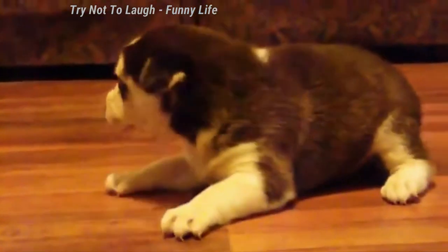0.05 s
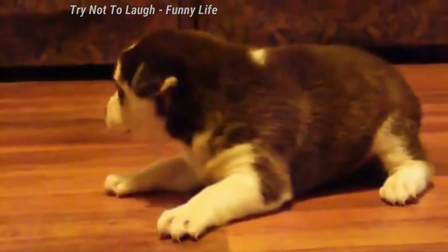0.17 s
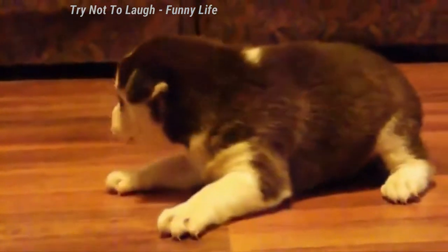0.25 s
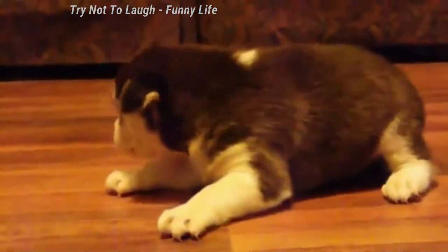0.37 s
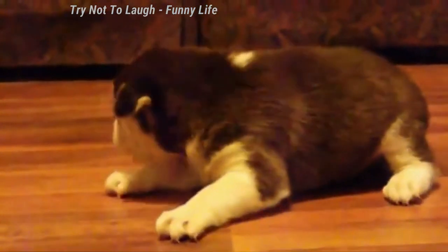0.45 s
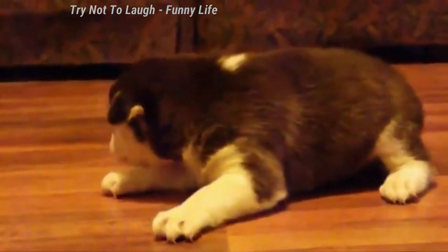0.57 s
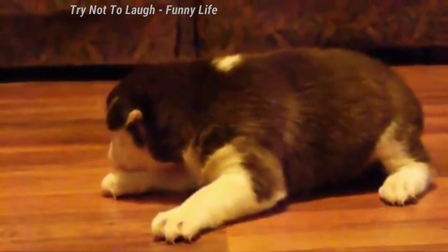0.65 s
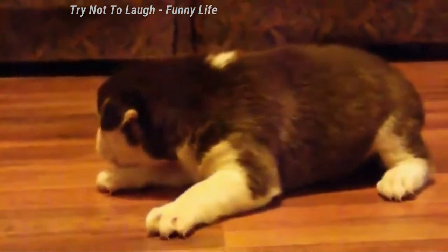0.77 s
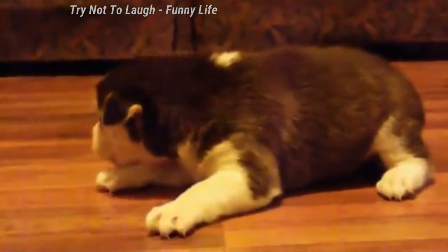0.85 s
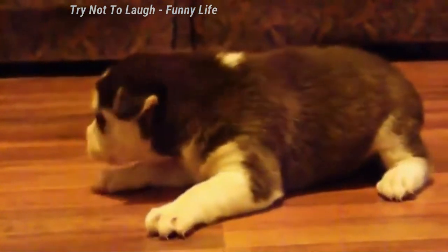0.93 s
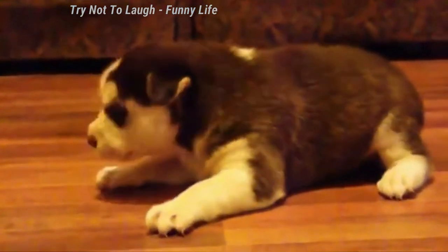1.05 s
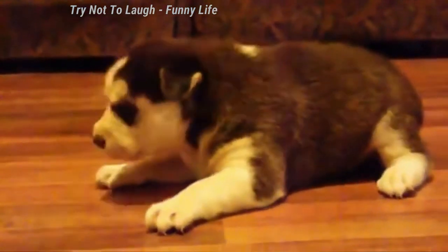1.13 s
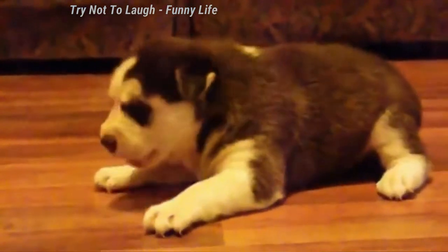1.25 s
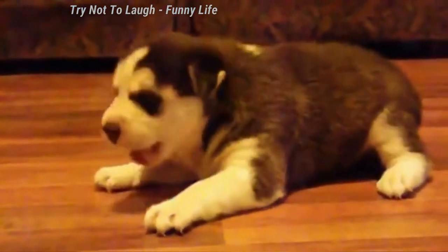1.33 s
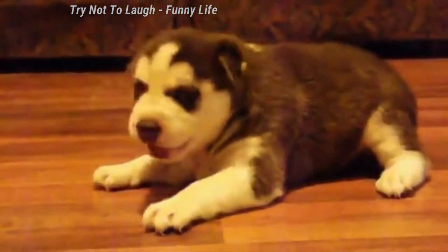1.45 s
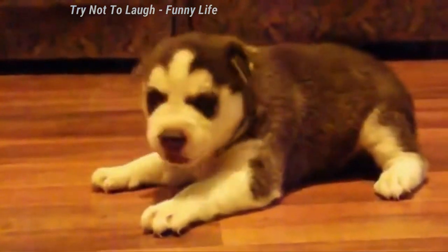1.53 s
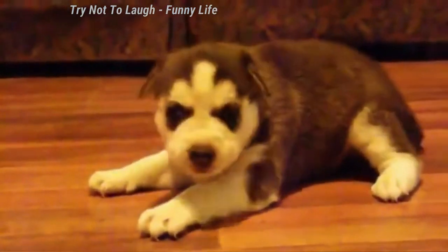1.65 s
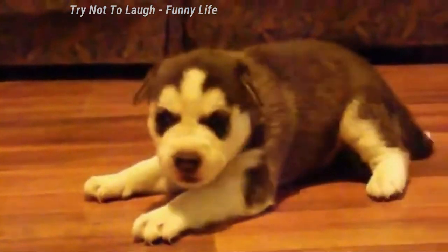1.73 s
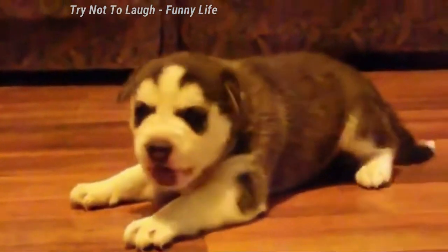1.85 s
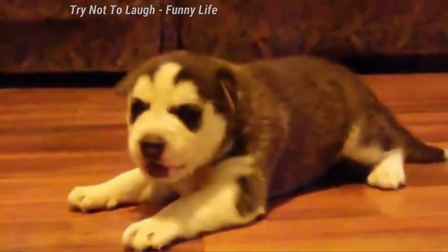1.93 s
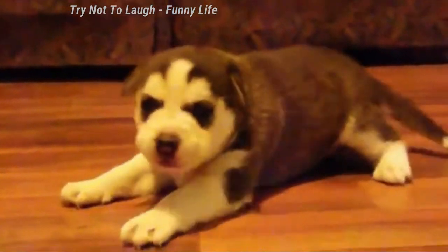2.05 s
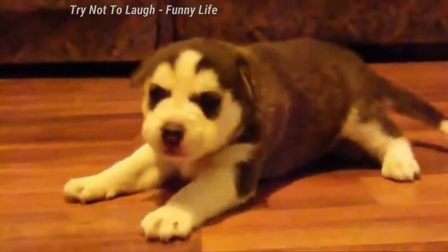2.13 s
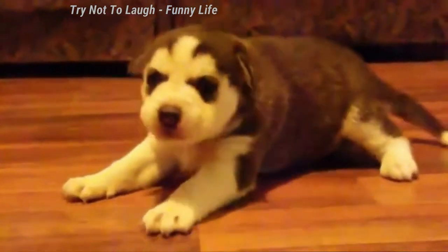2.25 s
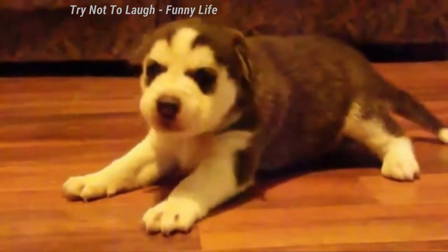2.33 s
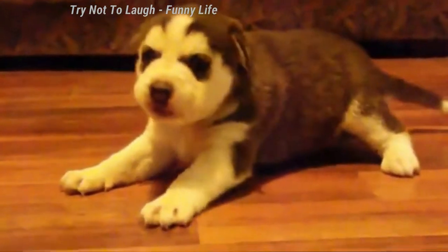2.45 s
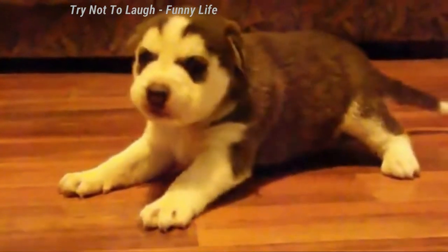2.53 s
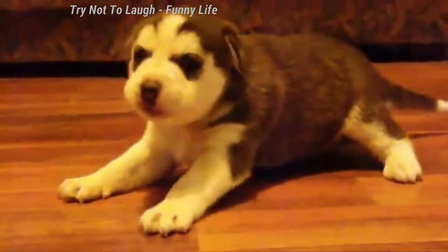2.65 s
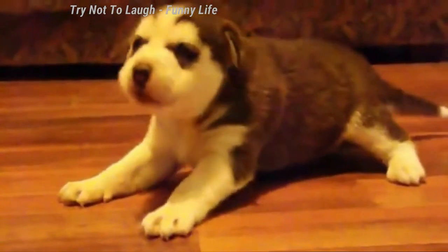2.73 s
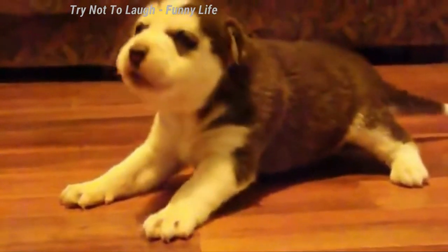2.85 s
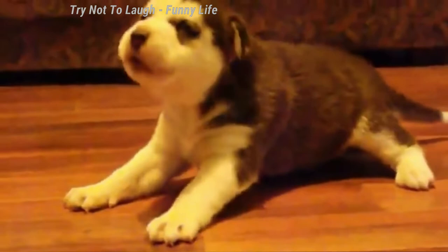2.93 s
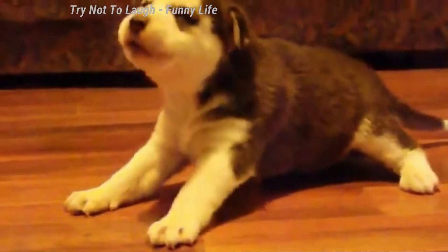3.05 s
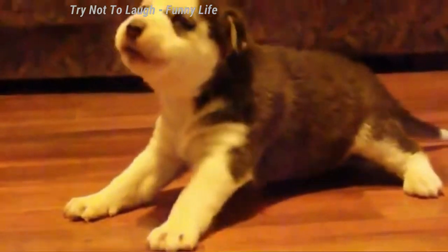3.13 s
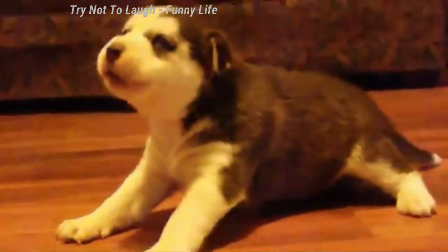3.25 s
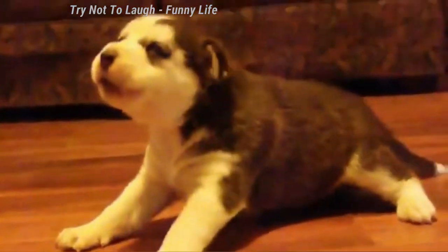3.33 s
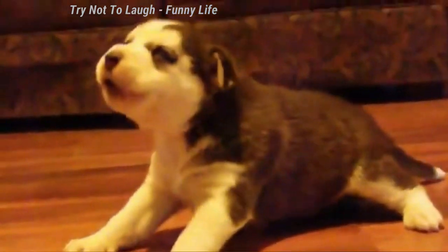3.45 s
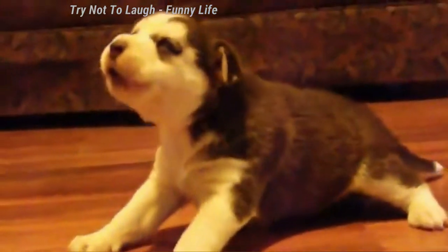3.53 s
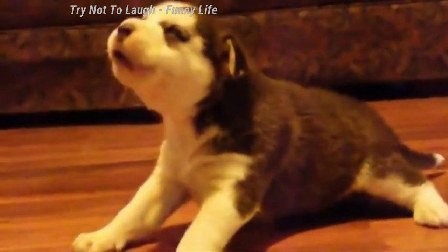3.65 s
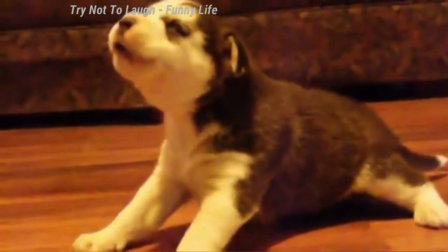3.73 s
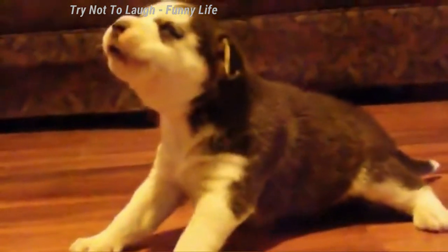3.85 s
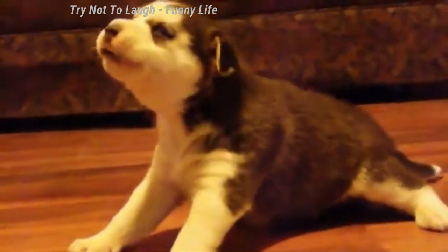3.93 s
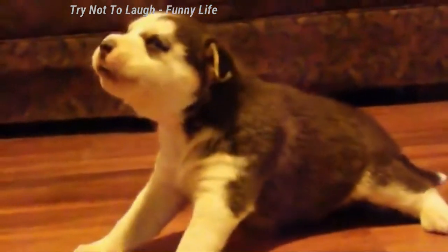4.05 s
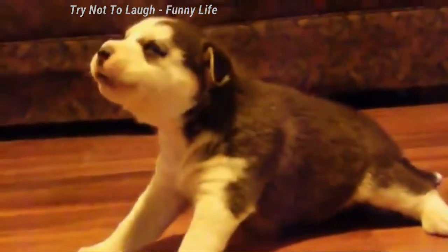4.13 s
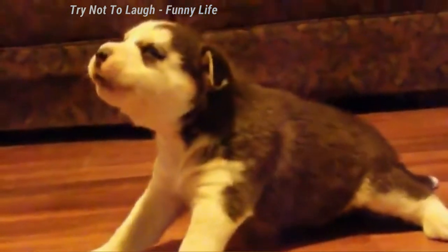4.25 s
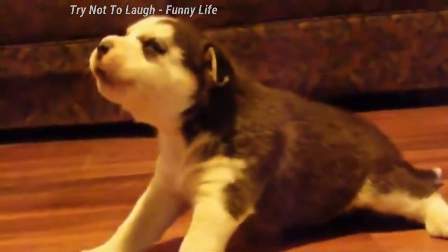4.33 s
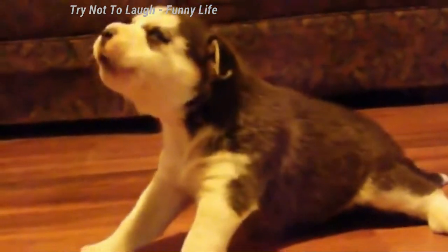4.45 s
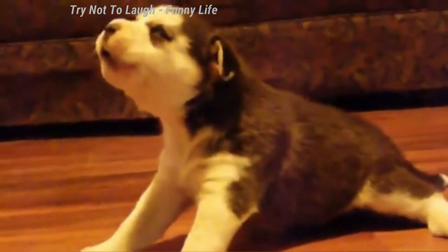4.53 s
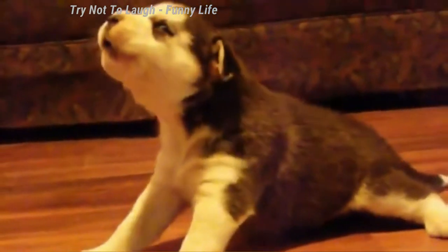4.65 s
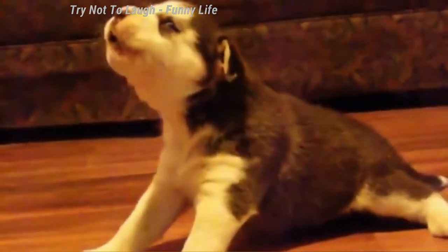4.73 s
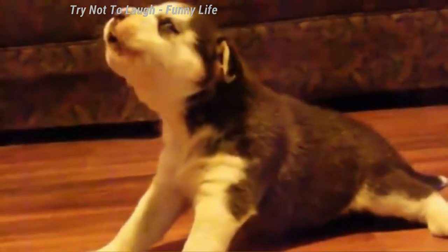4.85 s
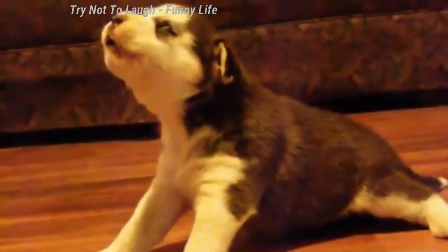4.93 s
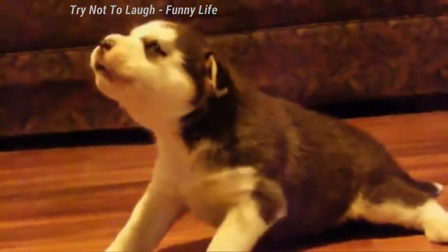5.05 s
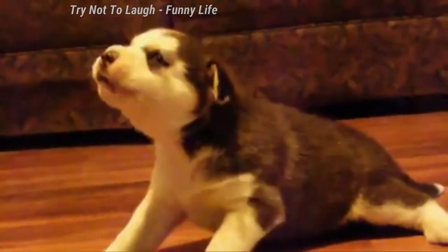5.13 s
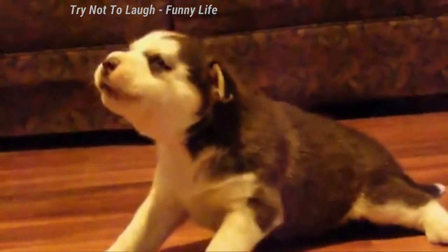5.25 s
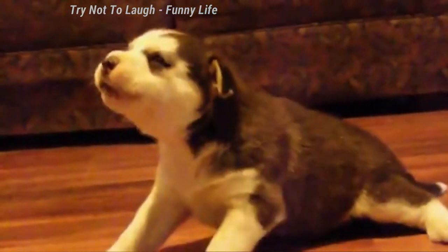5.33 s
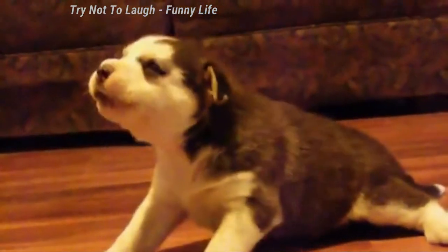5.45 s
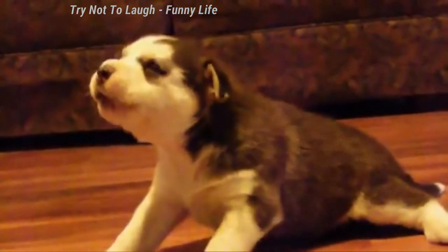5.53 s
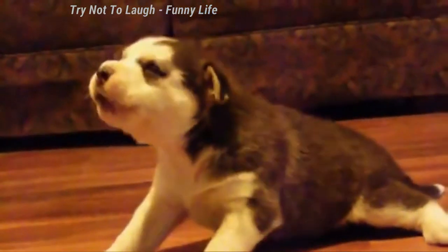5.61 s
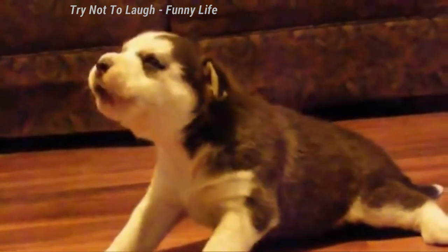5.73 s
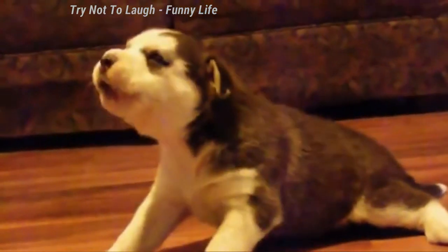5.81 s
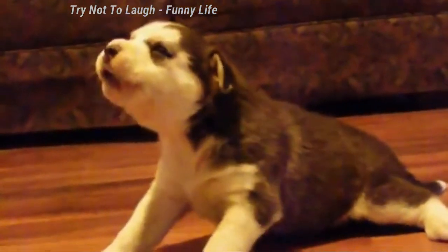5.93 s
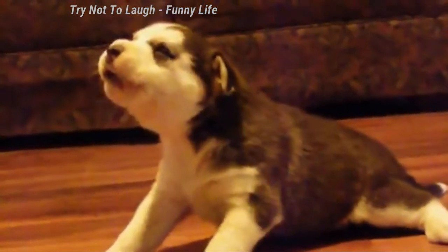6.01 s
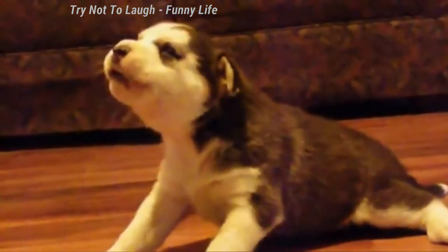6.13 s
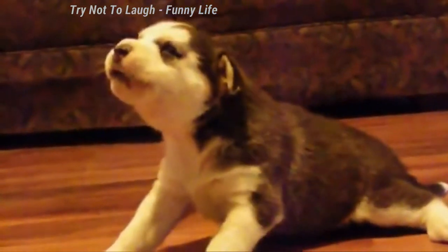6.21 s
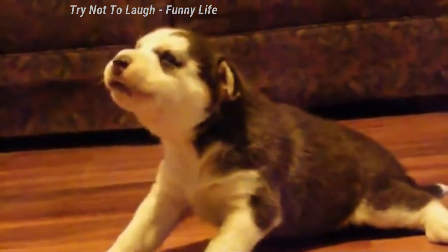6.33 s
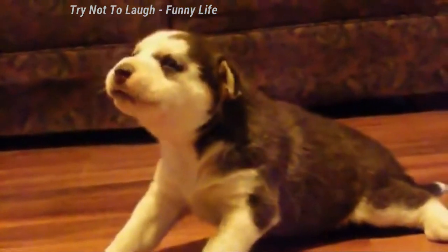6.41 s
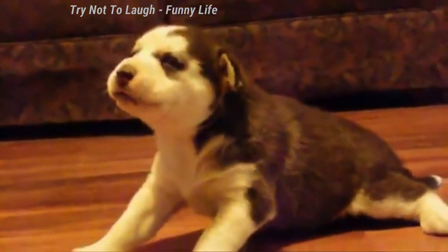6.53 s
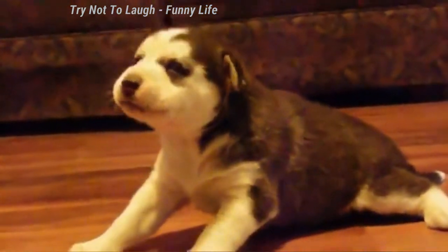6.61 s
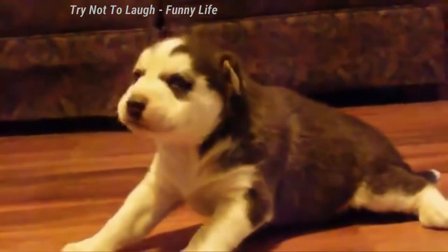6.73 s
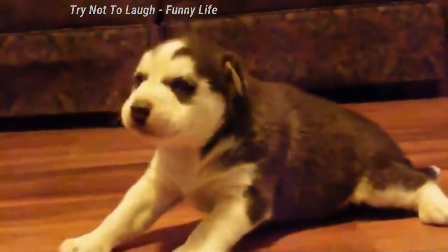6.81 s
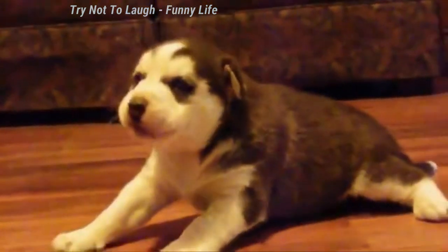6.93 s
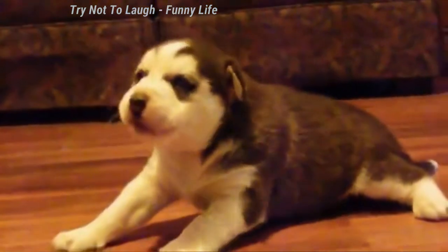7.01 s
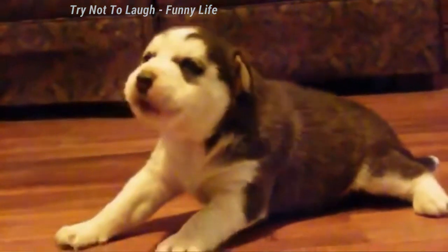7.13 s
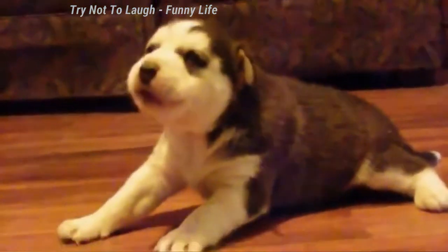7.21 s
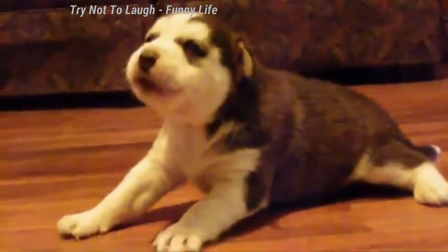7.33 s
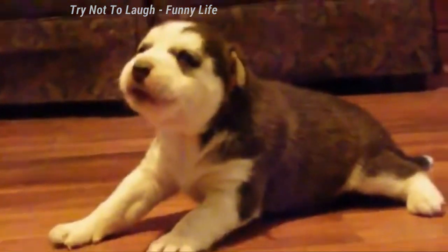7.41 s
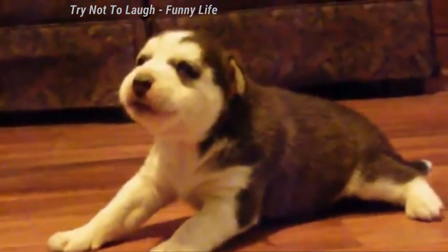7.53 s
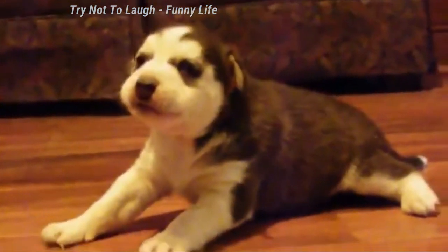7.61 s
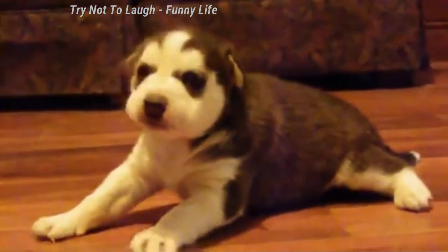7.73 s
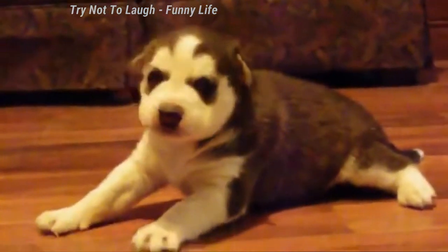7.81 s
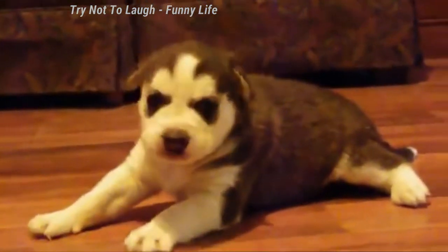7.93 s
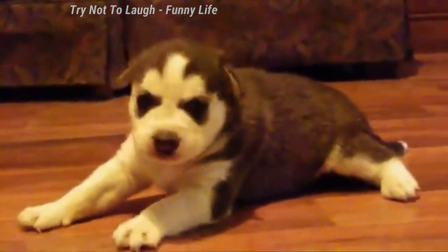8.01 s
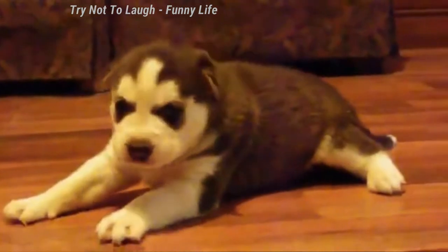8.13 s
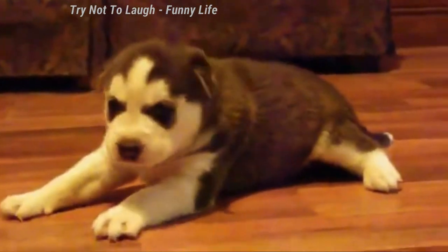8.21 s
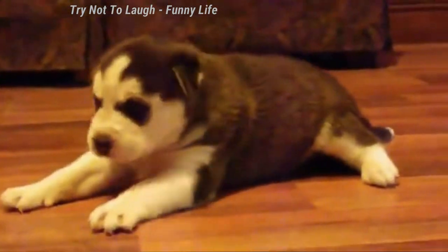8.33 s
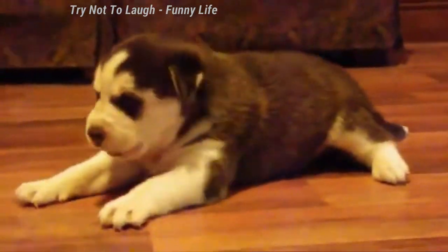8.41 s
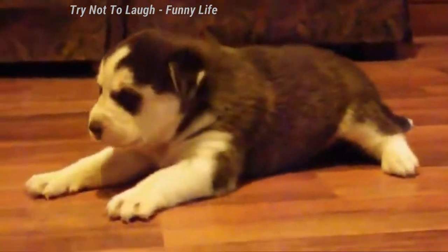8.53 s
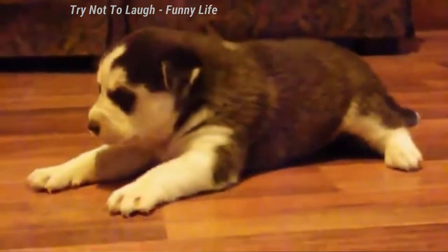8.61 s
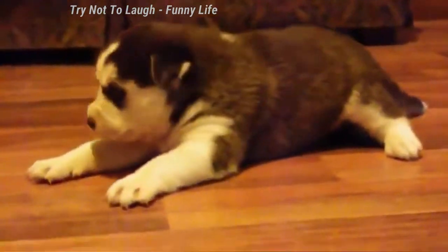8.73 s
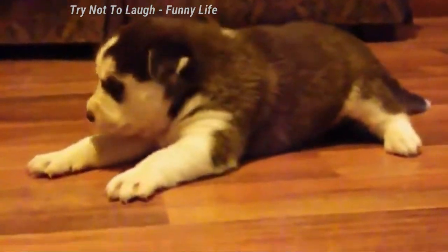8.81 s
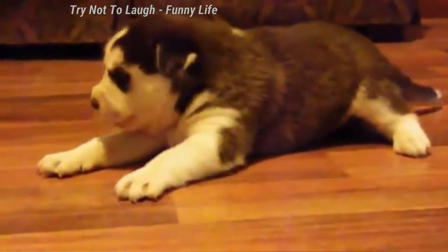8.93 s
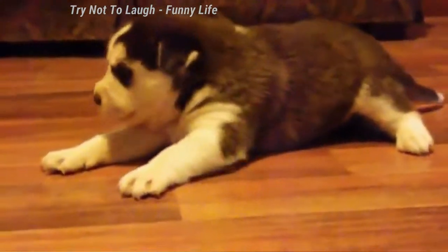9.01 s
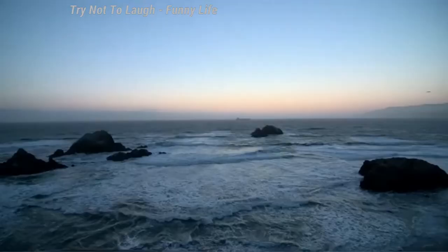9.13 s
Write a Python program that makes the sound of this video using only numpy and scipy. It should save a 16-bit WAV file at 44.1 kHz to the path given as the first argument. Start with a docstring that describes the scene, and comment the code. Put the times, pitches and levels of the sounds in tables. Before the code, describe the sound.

A young puppy gives sharp high yips, then longer wavering howls that start in little growls, in a small room with a faint hum.

```python
"""In a small living room with a wooden floor, a puppy yips and howls near a camera.
Each cry is a stack of harmonic partials, shaded by mouth and throat; some howls begin in a growl.
Growls and in-breath grunts are uneven pulse trains through resonances; noses puff and squeak, and
lips and claws tick, as filtered noise. An appliance hums in steady lines over the shaped hiss of the
room, sparse reflections follow each sound, and the camera turns its gain down on loud cries."""
import sys
import numpy as np
from scipy import signal
from scipy.fft import rfft, irfft
from scipy.io import wavfile
from scipy.ndimage import uniform_filter1d

SR = 44100
rng = np.random.default_rng(int(sys.argv[2]) if len(sys.argv) > 2 else 0)


def int16_out(signal):
    """Quantize to a 16-bit WAV file."""
    q = np.round(np.clip(np.atleast_2d(signal).T, -1, 1) * 32767)
    wavfile.write(sys.argv[1], SR, q.astype(np.int16))


N = 403955  # samples
LEAD_S = 0.15  # the first cry is already under way at time zero
END_S = 9.129  # the sound stops here
EDGE_HZ = 15600  # upper band limit

# One list a cry. Each row: time in seconds, pitch in Hz, level of the lowest two partials in dB,
# second partial against first in dB as the mouth resonance moves, level of the upper partials in dB.
CRIES = [
    [(-0.15, 1553, -12, -23, -34), (-0.04, 1500, -13.5, -23, -20), (0.014, 1224, -29, -3, -25),
     (0.062, 920, -18, 19, -28.5), (0.094, 871, -20.5, -10, -31.5), (0.142, 844, -17, 4, -30),
     (0.182, 838, -20.5, -8, -35.5), (0.205, 691, -28.5, -1, -45)],
    [(0.415, 1030, -36, -26, -64), (0.441, 1215, -5, -22, -33), (0.457, 1269, -4.5, -2, -31.5),
     (0.49, 1706, -7, -6.5, -21), (0.514, 1639, -8, -37, -27), (0.544, 1194, -19.5, -1, -28),
     (0.595, 826, -15, 17, -35)],
    [(0.78, 1042, -27, -26, -59), (0.802, 1156, -14.5, -18, -42), (0.828, 1293, -2, 7, -19),
     (0.854, 1629, -14.5, 14, -27.5), (0.9, 1573, -10, -23, -27), (0.95, 1056, -14.5, -6, -32.5),
     (1.082, 993, -25.5, -4.5, -32.5), (1.115, 745, -27.5, -4, -38)],
    [(1.305, 958, -35, -6, -60), (1.319, 1050, -5.5, -6.5, -18), (1.359, 1240, -9.5, -15, -19.5),
     (1.379, 1564, -5, -1.5, -22.5), (1.41, 1672, -16.5, -2, -35), (1.466, 1474, -11.5, -26, -26),
     (1.5, 1094, -20, -3, -23.5), (1.616, 1028, -17.5, -1, -17), (1.65, 668, -16.5, 10, -36)],
    [(1.815, 892, -12.5, 5, -35), (1.827, 985, -9.5, -4, -12.5), (1.923, 1738, -6.5, 5, -31.5),
     (1.951, 2003, -12.5, -16, -44), (1.979, 1813, -16.5, -5, -40), (2.007, 1485, -9.5, -24, -32),
     (2.057, 1275, -10.5, -34, -25), (2.113, 1243, -7.5, 6, -23.5), (2.179, 1218, -18.5, -16, -33),
     (2.205, 874, -43, -10, -52)],
    [(2.372, 851, -29, -3, -39), (2.41, 982, -7.5, 11, -9.5), (2.448, 1199, -13.5, -10, -24),
     (2.476, 1213, -11.5, -10, -23.5), (2.518, 1130, -26.5, -6, -23), (2.6, 1095, -26, -4, -27),
     (2.774, 1041, -24, -5, -29), (2.8, 1065, -26, -14, -33.5), (2.95, 1062, -21, -28, -30),
     (3.0, 931, -21, 0, -24), (3.025, 680, -19, -7, -55)],
    [(3.185, 778, -26.5, -21, -36), (3.2, 799, -24, -24, -28), (3.259, 916, -20, -10, -29),
     (3.321, 865, -28, -17, -56), (3.411, 946, -19.5, 0, -32), (3.499, 1002, -13, 2, -27),
     (3.68, 1016, -21.5, -4, -29), (3.769, 1006, -15, 7.5, -28), (3.859, 919, -15.5, -0.5, -27.5),
     (3.89, 696, -24, -25, -57)],
    [(4.42, 787, -22, 16, -53), (4.444, 866, -16.5, 3, -31), (4.494, 971, -6, 10.5, -30),
     (4.526, 969, -6.5, 10, -27), (4.554, 1001, -6.5, 7.5, -26), (4.694, 1046, -9, 9, -29),
     (4.85, 1023, -13, 2, -27.5), (4.95, 1015, -15.5, -2, -30), (5.03, 937, -21, -6.5, -32.5),
     (5.055, 749, -25, -21, -49)],
    [(5.6, 862, -27, 2, -42), (5.67, 851.5, -9, 2, -28), (5.7, 1074, -9.5, 7.5, -50),
     (5.724, 924, -12.5, 1, -21), (5.74, 968, -13, 3.5, -28), (5.972, 992.2, -13.5, 3, -26),
     (6.16, 964.6, -18.5, 4, -27), (6.256, 889.5, -18.5, -5.5, -26.5), (6.298, 776, -16.5, -17, -26),
     (6.335, 609, -30, -16, -49)],
    [(6.98, 861, -14, -16, -40), (7.024, 958, -34, -4, -59), (7.064, 1062, -32, 8, -51),
     (7.092, 954.5, -16.5, 5.5, -30), (7.164, 995.4, -16.5, 10, -25.5), (7.418, 979.3, -19, 6, -24.5),
     (7.534, 929, -17, -0.5, -23.5), (7.62, 869, -25, -2, -25.5), (7.678, 743, -30.5, -5, -34.5),
     (7.715, 720, -52, 4, -59)],
    [(7.968, 858, -26, -6, -33), (7.982, 804, -19, -10.5, -32.5), (8.018, 993, -18, 10.5, -28),
     (8.046, 1051, -31, 2, -22), (8.114, 904, -21.5, -4, -20), (8.162, 829, -17.5, -14, -29),
     (8.205, 618, -24.5, -12.5, -50)],
    [(8.395, 913, -22.5, -8, -34), (8.435, 1164, -7.5, -23.5, -32.5), (8.471, 1391, -5, -25, -20),
     (8.497, 1410, -7.5, -32, -24), (8.569, 1084, -24, -10, -36), (8.661, 978, -27, -5, -34.5),
     (8.685, 796, -25.5, -14, -51)],
    [(8.9, 930, -26, -13, -53), (8.912, 1010, -20, -31, -46.5), (8.972, 1370, 1, -12.5, -27.5),
     (8.992, 1419, -5, -23, -21.5), (9.032, 1336, -15, -27, -35), (9.06, 1125, -18.5, -8, -34),
     (9.102, 1014, -29, -10, -32), (9.135, 770, -30.5, 0, -70)],
]
# How the head is held. Each row, one a cry: room level in dB, higher when the head turns away,
# level of the third partial in dB in a cry of the usual level and shade.
POSES = [(-4.5, -29.5), (-4, -30), (-5.5, -29), (-11.5, -25), (-12.5, -28.5), (-11, -39.5), (-8, -31.5),
         (-10.5, -31.5), (-8.5, -24), (-8.5, -28), (-11, -30), (-9, -31), (-9.5, -27)]
# Mouth's shading of the third partial. Each row: frequency in Hz, level in dB.
CHEEKS = [(1800, -24.5), (2600, -6), (3100, -2), (3600, 0.5), (4100, -5), (5000, 5.5), (6000, 10.5)]
# Throat's shading of the upper partials. Each row: frequency in Hz at the usual pitch, relative level in dB.
THROAT = [(2500, 39), (3700, -10.5), (4900, 12), (6000, 7.3), (7000, 9.5), (8000, -6), (9000, -6),
          (10200, -20.5), (12000, -24), (13500, -63), (15500, -88)]
# Brief catches of the voice. Each row: centre in seconds, length in seconds, pitch jump as a share,
# swell of the overtones in dB, level of the crackle in dB.
CATCHES = [(0.446, 0.0052, -0.0071, 1.5, -29), (1.343, 0.0039, 0.02, 1.5, -13),
           (1.625, 0.0073, 0.017, 9.5, -30), (2.205, 0.0067, -0.032, 25, -42),
           (2.743, 0.018, -0.023, -3.5, -63), (2.627, 0.019, 0.01, 2.5, -62), (5.789, .007, 0.13, -2, -33),
           (7.121, 0.01, .04, -7, -55), (7.184, 0.0121, 0.044, -0.5, -55),
           (7.233, 0.01195, 0.0044, 1.5, -56), (7.281, 0.0098, 0.044, 1.5, -52),
           (8.435, 0.0052, 0.025, 17.5, -16.5), (8.942, 0.0051, 0.023, 15.5, -20.5)]
# Spells in which the voice turns hoarse. Each row: start in seconds, end in seconds, share from 0 to 1.
STRAINED = [(.5, .58, .35), (.85, .93, .3), (1.352, 1.48, .45), (1.9, 2.02, .25), (5.79, 5.81, .8),
            (8.5, 8.6, .3), (9, 9.08, .3)]
USUAL_DB, USUAL_UPPER_DB, USUAL_HZ = -18, -28, 1000  # where the third partial and throat are as listed
WITH_LEAN, WITH_LEVEL, WITH_UPPER = 0.046, 0.51, 0.65  # dB of the third partial per dB of each
STRETCH = 0.25  # power of pitch by which the throat shading shifts
FALL_DB = -0.5  # the upper partials dim as the pitch drops: dB per octave a second
BREAK_S, BREAK_HOARSE = 0.035, 0.9  # the voice breaks up as a cry ends: seconds, share
GROWL_HOARSE = 0.6  # share of hoarseness while a growl lasts
EMERGE_S, ONSET_S = 0.06, 0.0025  # rise of a tone out of a growl, and of any other tone

# Background hiss. Each row: frequency in Hz, relative density in dB per Hz.
HISS = [(12, -39), (20, -52), (54, -38), (101, -7.5), (266, -2.5), (362, -9.5), (465, -9.5), (789, -6.5),
        (1340, -5.5), (1540, -8), (2090, -5.5), (2760, -8.5), (4690, -8.5), (12100, -21.5), (15500, -35)]
HISS_DB = -46.5  # overall level
# Lines of the appliance. Each row: frequency in Hz, level in dB.
HUM = [(120, -59), (240, -60.5), (300, -60.5), (472, -59), (600, -68)]
# Decay of the room. Each row: frequency in Hz, time to die by 60 dB in seconds.
WALLS = [(250, 0.17), (660, 0.33), (1740, 0.43), (4590, 0.47), (10000, 0.21)]
# Colour of the reflections. Each row: frequency in Hz, level in dB.
REFLECTION_COLOUR = [(300, -4), (1400, 2.5), (2600, -3), (4000, -1.5), (8000, 1)]

# Grunts on the in-breath. Each row: start in seconds, length in seconds, peak in dB,
# top pulse rate in Hz, roughness from 0 to 1.
GRUNTS = [(0.727, 0.13, -42.5, 410, 0.05), (2.247, 0.058, -34, 237, 0.42), (3.059, 0.052, -35, 226.3, 0.4),
          (4.047, 0.11, -25, 401, 0.34), (5.219, 0.11, -27, 401, .28), (6.507, 0.15, -27.5, 391, 0.2),
          (7.677, 0.039, -34.5, 406, 0.35)]
GRUNT_ENDS_DB, GRUNT_HIGH_HZ = -16, 816  # level of the ends against the peak; high resonance
GRUNT_ARCH = 0.4  # share of the top rate lost at the ends
# Growls, the folds beating slowly and unevenly. Each row: start in seconds, swell in seconds,
# release in seconds, peak in dB, low resonance at the start in Hz, high resonance against low in dB.
GROWLS = [(3.29, 0.016, 0.048, -15.5, 660, -11), (3.352, 0.0098, 0.048, -18, 687, -9),
          (4.318, 0.11, 0.095, -11, 572, -6.5), (5.497, .17, 0.029, -12.5, 530, -6),
          (6.928, 0.1, 0.089, -15, 490, -9.5)]
GROWL_SWELL_DB, GROWL_RELEASE_DB = -8.5, -11  # levels at the start and end, against the peak
GROWL_HZ, GROWL_HIGH_HZ = 433.7, 1644  # pulse rate and high resonance at the start
RATE_RISE, LOW_RISE, HIGH_RISE = 0.6, 2.05, 0.39  # shares a second, as the jaw opens into the howl
ROUGH_START, ROUGH_PEAK, COARSEN_S = 0.3, 0.52, 0.08  # a growl coarsens over this many seconds
# Chest and upper resonances of growls and grunts. Each row: frequency in Hz, width in Hz, relative level in dB.
RASP = [(253, 155, -19), (2810, 1500, -22.5), (5400, 1100, -19.5), (6550, 800, -21.5), (8350, 680, -37),
        (11200, 900, -41)]

# Snaps of lips and claws. Each row: time in seconds, treble level in dB, body against treble in dB.
TICKS = [(4.9033, -56, 6), (5.0295, -46, -5), (5.7894, -46, 13), (6.648, -54.5, 17.5), (6.7453, -61, 19),
         (6.954, -51, 14)]
# Air through the nose. Each row: start in seconds, length in seconds, level before the swell and fade in dB.
PUFFS = [(5.019, 0.2, -61), (6.12, 0.42, -52), (6.888, .14, -68), (7.995, .2, -65)]
# A thin whistle in the nose. Its row: start in seconds, length in seconds, frequency in Hz,
# level before the swell and fade in dB.
SQUEAK = (6.565, .07, 3300, -46)
# Dips of the camera housing. Each row: frequency in Hz, width in Hz, depth from 0 to 1.
NOTCHES = [(7947, 425, 0.91), (10300, 750, 0.45)]


def gain_of(db):
    """Amplitude is ten to the power of decibels over twenty."""
    return 10 ** (np.asarray(db) / 20)


def evened(x):
    """Dividing by the root mean square gives a signal unit power."""
    return x / np.sqrt(np.mean(x ** 2) + 1e-20)


def read(points, hz):
    """A spectral curve is interpolated linearly along log frequency."""
    f, value = np.transpose(points)
    return np.interp(np.log(hz + 1), np.log(f + 1), value)


def add(mix, s, sound):
    """Sounds superpose linearly; the mix begins LEAD_S before time zero."""
    part = mix[round((s + LEAD_S) * SR):][:len(sound)]
    part += sound[:len(part)]


def unfold(rows):
    """Straight lines between the rows give the start time and one curve a column."""
    s, *columns = np.transpose(rows)
    t = np.arange(s[0], s[-1], 1 / SR)
    return s[0], [np.interp(t, s, column) for column in columns]


def wobble(count, rate_hz):
    """Twice-averaged white noise is a slow random fluctuation, here of unit power."""
    span = max(int(SR / rate_hz), 1)
    noise = rng.standard_normal(count)
    return evened(uniform_filter1d(uniform_filter1d(noise, span), span))


def fades(count, rise_s, fall_s):
    """Linear ramps of amplitude soften the start and end."""
    t = np.arange(count) / SR
    return np.clip(t / rise_s, 0, 1) * np.clip(t[::-1] / fall_s, 0, 1)


def resonate(x, hz, width):
    """Heterodyning: a one-pole smoother on the band shifted to zero is a resonance, movable, of gain 1."""
    turn = np.exp(2j * np.pi * np.cumsum(hz * np.ones(len(x))) / SR)
    pole = np.exp(-np.pi * width / SR)
    smooth = signal.lfilter([1 - pole], [1, -pole], x / turn + 1e-18)
    return 2 * (turn * smooth).real


def resonate_twice(x, hz, width):
    """Two equal resonances in cascade have steeper skirts than one."""
    return resonate(resonate(x, hz, width), hz, width)


def hoarseness(t):
    """Irregular vibration of the folds: the share rises in strain, during growls and as a cry ends."""
    growling = [(a, a + swell + release, GROWL_HOARSE) for a, swell, release, *_ in GROWLS]
    spells = STRAINED + growling + [(t[-1] - BREAK_S, t[-1], BREAK_HOARSE)]
    return uniform_filter1d(sum(share * (a < t) * (t < b) for a, b, share in spells), 600)


def upper_partials(hz, turn, upper_db, stretch):
    """Source and filter: the throat's curve weights partials 4 to 16, whose summed power is then set."""
    order = np.arange(4, 17)[:, None]
    shade = gain_of(read(THROAT, order * hz / stretch)) * (order * hz < EDGE_HZ)
    shade *= gain_of(upper_db) / np.sqrt((shade ** 2).sum(0))
    return (shade * np.cos(order * turn + rng.uniform(0, 2 * np.pi, order.shape))).sum(0)


def cry(rows, third_db):
    """Harmonic series: one phase drives all partials, so pitch jitter, tremor and catches move them together."""
    s, (hz, level_db, lean_db, upper_db) = unfold(rows)
    t = s + np.arange(len(hz)) / SR
    at, length, jump, swell_db, crackle_db = np.transpose(CATCHES)[:, :, None]
    catch = np.exp(-((t - at) / length) ** 2)
    hz = uniform_filter1d(hz, 400, mode="nearest")

    first = gain_of(level_db) / np.hypot(1, gain_of(lean_db))
    second = first * gain_of(lean_db)
    pitch_drop = np.clip(-np.gradient(np.log2(hz)) * SR, 0, None)  # octaves a second
    upper_db = upper_db + FALL_DB * pitch_drop
    third_db = third_db + WITH_LEAN * lean_db + WITH_LEVEL * (level_db - USUAL_DB)
    third_db = third_db + WITH_UPPER * (upper_db - USUAL_UPPER_DB) + read(CHEEKS, 3 * hz)
    third = gain_of(third_db)
    stretch = (hz / USUAL_HZ) ** STRETCH

    hoarse = hoarseness(t)
    hz *= 1 + (jump * catch).sum(0) + 0.0049 * wobble(len(t), rate_hz=77)
    hz *= 1 + 0.05 * hoarse * wobble(len(t), rate_hz=400)
    turn = 2 * np.pi * np.cumsum(hz) / SR
    upper = upper_partials(hz, turn, upper_db, stretch)
    overtones = second * np.cos(2 * turn) + third * np.cos(3 * turn) + upper
    swell = gain_of((swell_db * catch).sum(0))
    tone = np.sqrt(2) * np.array([first * np.cos(turn), swell * overtones])

    air = gain_of(-32.0) * wobble(len(t), rate_hz=1370)  # turbulence roughens every partial a little
    tremor = gain_of((2.19 + 3.53 * hoarse) * wobble(len(t), rate_hz=62.6))
    noise = evened(resonate_twice(rng.standard_normal(len(t)), 2400, 1800))
    crackle = (gain_of(crackle_db) * catch).sum(0) * noise
    from_growl = any(a < s < a + swell_s + release_s for a, swell_s, release_s, *_ in GROWLS)
    rise_s = EMERGE_S if from_growl else ONSET_S
    # half the crackle goes with the first partial, half with the overtones
    voice = (tone * (1 + air) * tremor + crackle / 2) * fades(len(t), rise_s, 0.0016)
    return s, *voice


def hiss():
    """Spectral shaping: random short-time spectra take the room's curve and drifting soft patches."""
    frames, hz = N // 256 + 5, np.fft.rfftfreq(1024, 1 / SR)
    real, imaginary, patches = rng.standard_normal((frames, 513, 3)).T
    patches = evened(uniform_filter1d(uniform_filter1d(patches, 12, 0), 14, 1))
    z = (real + 1j * imaginary) * gain_of(read(HISS, hz)[:, None] + 2.7 * patches)
    return gain_of(HISS_DB) * evened(signal.istft(z, nperseg=1024, noverlap=768)[1][:N])


def hum():
    """Line spectrum: sinusoids of the appliance waver slightly in level and phase."""
    t = np.arange(N) / SR
    lines = np.zeros(N)
    for f, db in HUM:
        level = gain_of(db + 0.95 * wobble(N, rate_hz=4.2))
        lines += level * np.sin(2 * np.pi * f * t + 0.3 * wobble(N, rate_hz=5.8))
    return np.sqrt(2) * lines


def room(x):
    """Reverberation: sparse reflections of random sign, each band decaying exponentially at its own rate."""
    taps = np.zeros(SR)
    at = np.arange(400, SR - 20, 20) + rng.integers(0, 20, (SR - 401) // 20)
    taps[at] = rng.choice([-1., 1.], at.shape)
    hz, t, z = signal.stft(taps, SR, nperseg=256)
    z *= gain_of(-60 * t / read(WALLS, hz)[:, None])
    z /= np.linalg.norm(signal.istft(z, SR, nperseg=256)[1])  # unit energy before the colour
    z *= gain_of(read(REFLECTION_COLOUR, hz)[:, None])
    return signal.fftconvolve(x, signal.istft(z, SR, nperseg=256)[1])[:len(x)]


def rough_voice(s, controls, high_db, rasp_db, width, breath):
    """Source and filter: uneven pulses, strong and weak in turn, and noise puffs excite moving resonances."""
    level_db, hz, rough, low_hz, high_hz = controls
    count, rough = len(hz), np.clip(rough, 0, 1)
    turns = np.cumsum(hz * (1 + (0.02 + 0.11 * rough) * wobble(count, rate_hz=120))) / SR
    folds = sum(np.cos(2 * np.pi * k * turns) for k in range(1, 28))
    alternation = np.cos(np.pi * turns + wobble(count, rate_hz=40))  # half the pulse rate
    clumps = wobble(count, rate_hz=200)
    folds *= 1 + 1.1 * rough * alternation + 0.8 * rough * clumps
    puffs = (0.53 + np.exp(-(turns % 1) / 0.31)) * rng.standard_normal(count)
    drive = evened(folds) + (breath + 0.35 * rough) * evened(puffs)

    low = evened(resonate_twice(drive, low_hz, width))
    high = evened(resonate_twice(drive, high_hz, 2.2 * width))
    rasp = sum(gain_of(db) * evened(resonate_twice(puffs + drive, f, w)) for f, w, db in RASP)
    throat = low - gain_of(high_db) * high + gain_of(rasp_db) * rasp
    return s, gain_of(level_db) * evened(throat) * fades(count, 0.0082, 0.014)


def grunt(start, length, peak_db, top_hz, rough):
    """Breath effort: level and pulse rate arch together, and the low resonance follows the rate."""
    arch = np.sin(np.pi * np.arange(0, length, 1 / SR) / length)
    hz = top_hz * (1 - GRUNT_ARCH * (1 - arch))
    level_db = peak_db + GRUNT_ENDS_DB * (1 - arch) ** 1.4
    controls = level_db, hz, rough, (hz + top_hz) / 2, GRUNT_HIGH_HZ
    return rough_voice(start, controls, high_db=-8, rasp_db=0.5, width=336, breath=0.2)


def growl(start, swell, release, peak_db, low_hz, high_db):
    """Jaw opening: resonances and pulse rate rise while the uneven folds swell, coarsen and let go."""
    t = np.arange(0, swell + release, 1 / SR)
    shape_db = np.interp(t, [0, swell, swell + release], [GROWL_SWELL_DB, 0, GROWL_RELEASE_DB])
    hz = GROWL_HZ * (1 + RATE_RISE * t)
    rough = np.interp(t, [0, COARSEN_S], [ROUGH_START, ROUGH_PEAK])
    low_hz = low_hz * (1 + LOW_RISE * t)
    high_hz = GROWL_HIGH_HZ * (1 + HIGH_RISE * t)
    controls = peak_db + shape_db, hz, rough, low_hz, high_hz
    return rough_voice(start, controls, high_db=high_db, rasp_db=-4.0, width=267, breath=0.072)


def tick(s, treble_db, body_db):
    """Impulsive excitation: a decaying noise burst excites a sharp edge and a duller body."""
    t = np.arange(300) / SR
    snap = rng.standard_normal(len(t)) * np.exp(-t / 0.0019)
    edge, body = evened(resonate(snap, 11000, 5000)), evened(resonate(snap, 3500, 3000))
    return s, gain_of(treble_db) * (edge + gain_of(body_db) * body)


def puff(start, length, db):
    """Turbulence: air is broad noise, bright from a wide high resonance, that swells and fades."""
    air = rng.standard_normal(round(length * SR))
    bright = evened(resonate(resonate(air, 10000, 4800), 10000, 4700))
    return start, gain_of(db) * bright * np.hanning(len(air))


def squeak(start, length, hz, db):
    """Narrow-band noise: a sharp resonance turns air noise into a fuzzy whistle."""
    air = rng.standard_normal(round(length * SR))
    whistle = evened(resonate(resonate(air, hz, 180), hz, 200))
    return start, gain_of(db) * whistle * np.hanning(len(air))


def scene():
    """Superposition: direct sound and reflections of the puppy add to the steady background."""
    throaty, small = np.zeros(N + SR), np.zeros(N + SR)
    for mix, source, rows in [(small, grunt, GRUNTS), (throaty, growl, GROWLS), (small, tick, TICKS),
                              (small, puff, PUFFS), (small, squeak, [SQUEAK])]:
        for row in rows:
            add(mix, *source(*row))
    near = throaty + small
    far = gain_of(-5.5) * throaty + gain_of(-6.0) * small  # sent to the room
    for (wet_db, third_db), rows in zip(POSES, CRIES):
        s, first, overtones = cry(rows, third_db)
        # a turned head hides the overtones from the direct path
        shadow = gain_of(-1.2 * max(wet_db + 5.5, 0))
        add(near, s, first + shadow * overtones)
        add(far, s, gain_of(wet_db) * (first + overtones))
    heard = near + room(far)
    return (heard[round(LEAD_S * SR):][:N] + hiss() + hum())[None]


def record(dry):
    """Signal chain: housing dips, gain control, lopsided overload, bass cut, the stop, then the band limit."""
    hz = np.fft.rfftfreq(N, 1 / SR)
    dips = np.ones(len(hz))
    for f, width, depth in NOTCHES:
        dips *= 1 - np.clip(depth, 0, 1) / (1 + ((hz - f) / width) ** 2)
    x = irfft(rfft(dry) * dips, N)

    power_db = 10 * np.log10(abs(uniform_filter1d(x[0] ** 2, 300)) + 1e-12)
    fall = np.arange(N) * 42.0 / SR  # the held peak level falls 42 dB a second
    held_db = np.maximum.accumulate(power_db + fall) - fall
    over_db = np.maximum(held_db + 13.5, 0)  # excess above -13.5 dB
    x = x / gain_of(0.56 * uniform_filter1d(over_db, 400))

    x = np.clip(x, -1, 0.98)
    x = signal.lfilter(*signal.butter(2, 32, "high", fs=SR), x)
    x *= np.clip((END_S - np.arange(N) / SR) / 0.0027, 0, 1)
    band = signal.firwin(1023, EDGE_HZ, window=("kaiser", 9), fs=SR)
    return signal.oaconvolve(x, band[None], "same")


dry = scene()
out = record(dry)
int16_out(out)
```